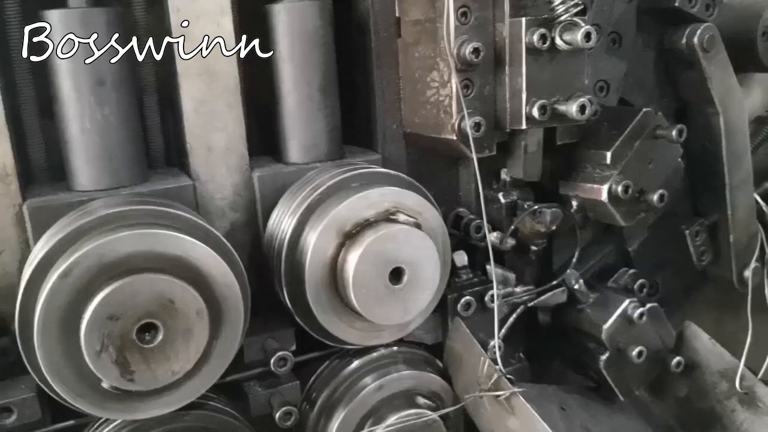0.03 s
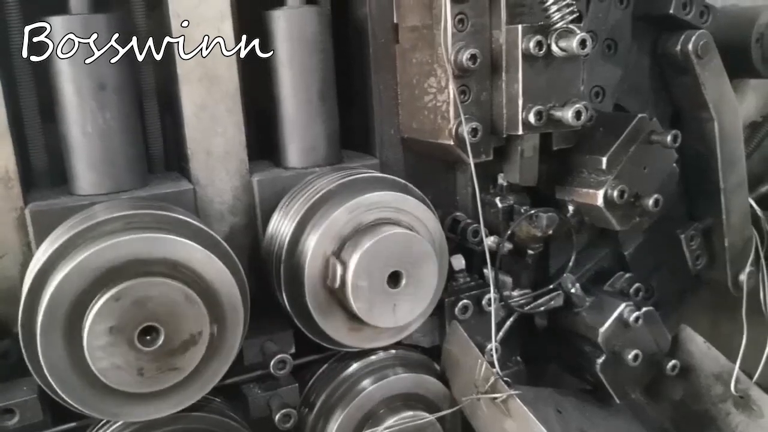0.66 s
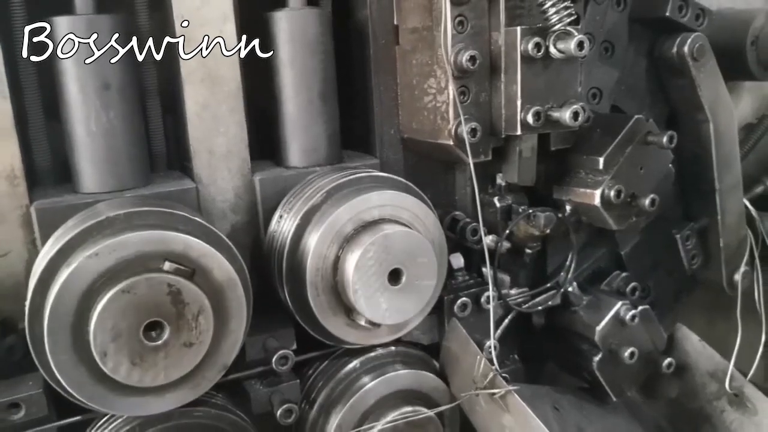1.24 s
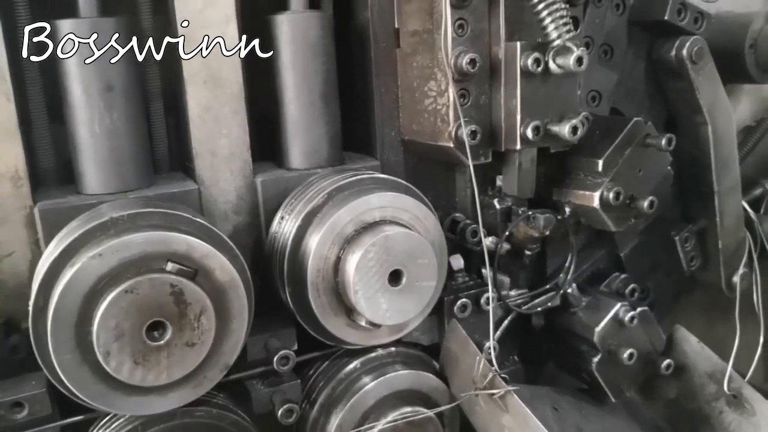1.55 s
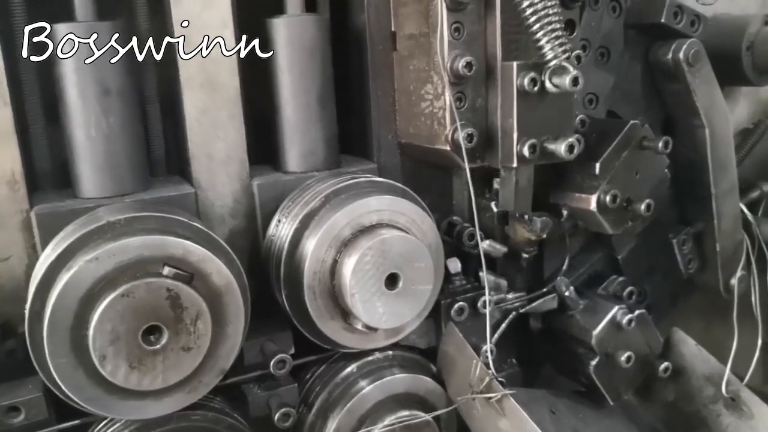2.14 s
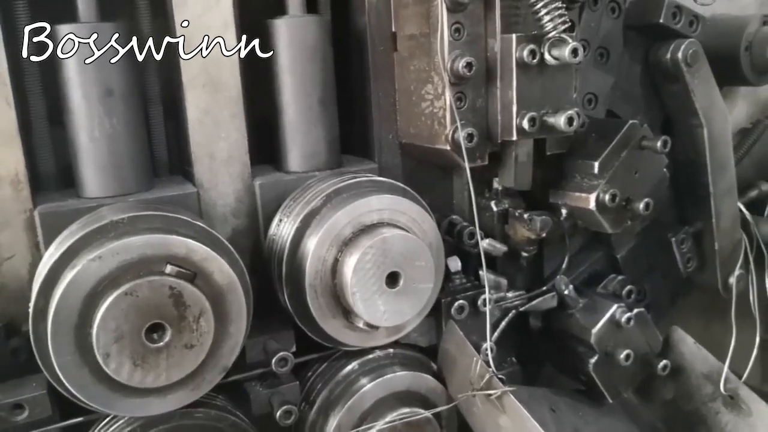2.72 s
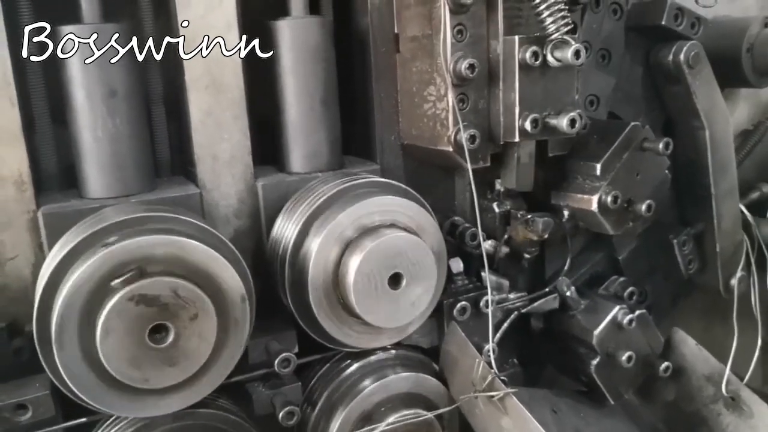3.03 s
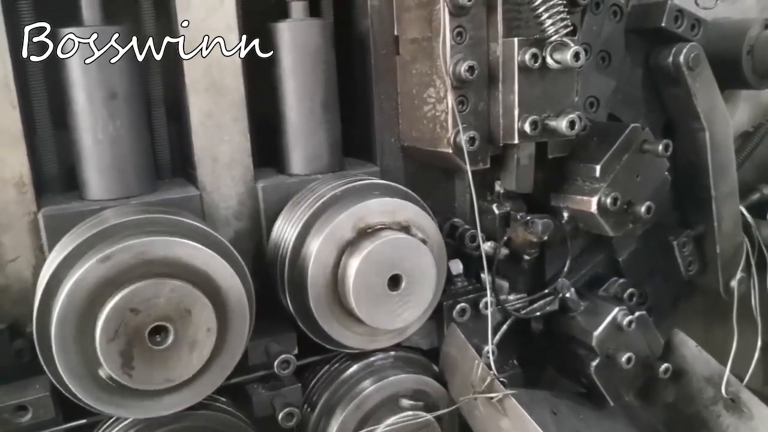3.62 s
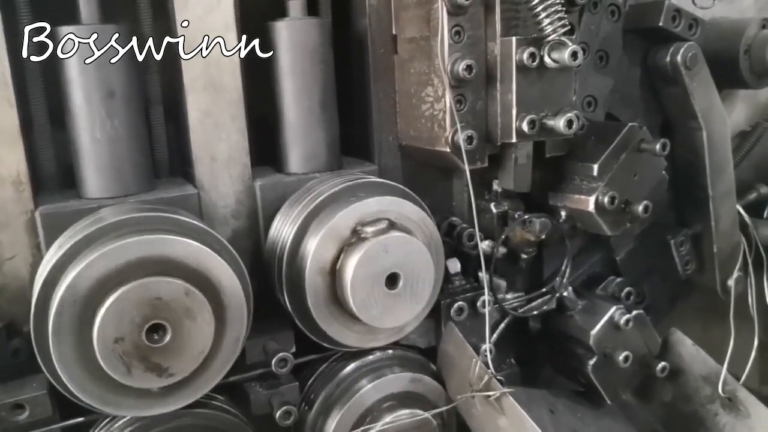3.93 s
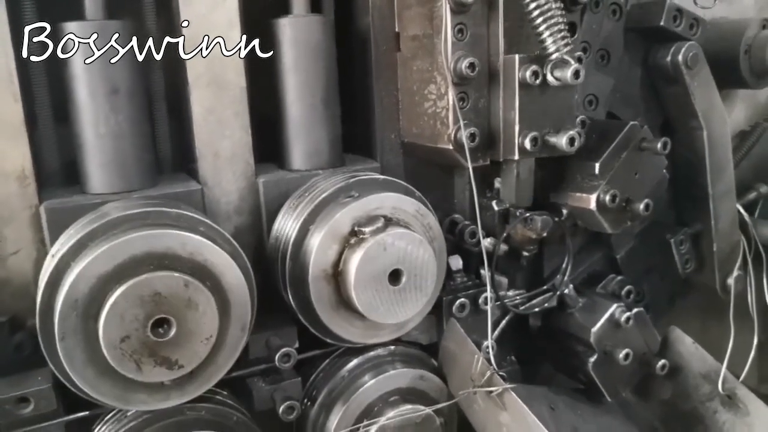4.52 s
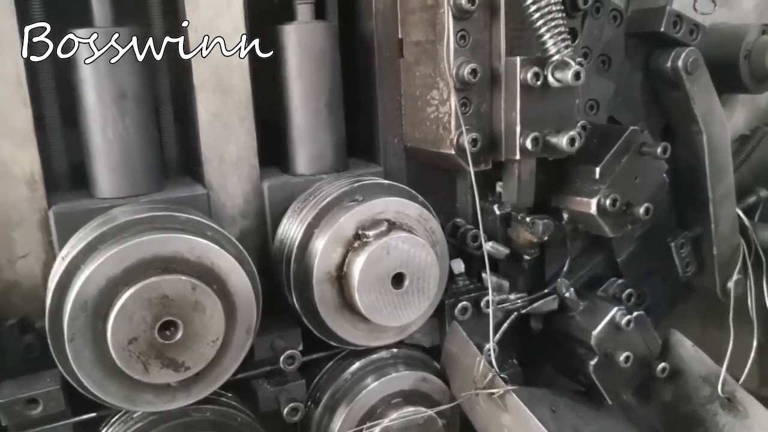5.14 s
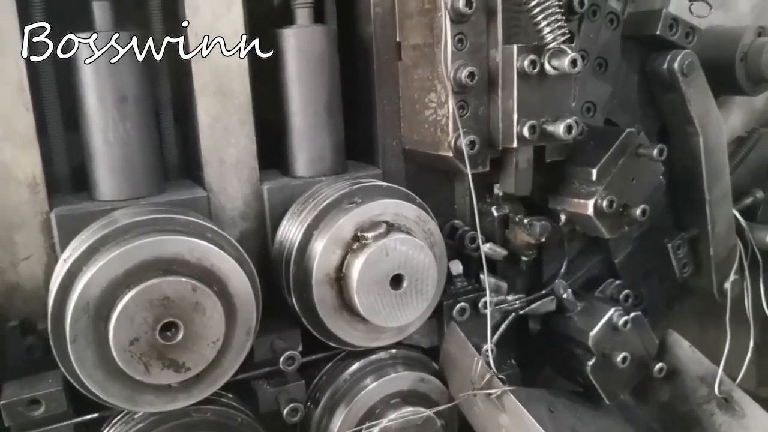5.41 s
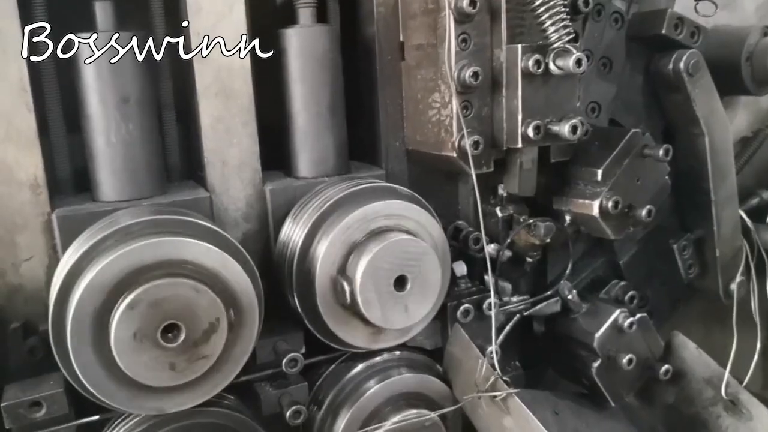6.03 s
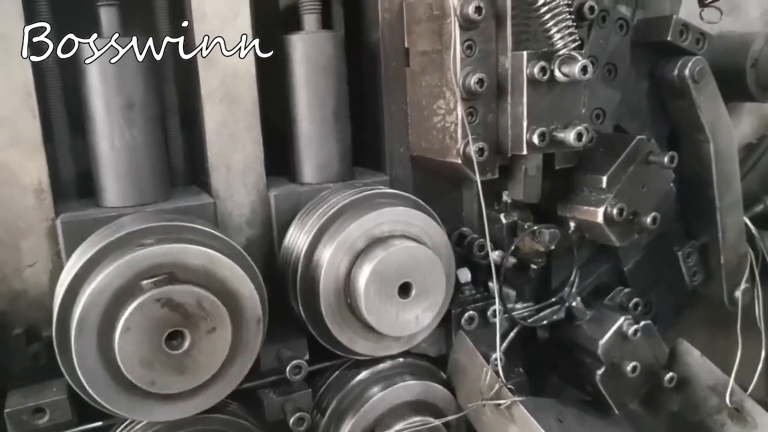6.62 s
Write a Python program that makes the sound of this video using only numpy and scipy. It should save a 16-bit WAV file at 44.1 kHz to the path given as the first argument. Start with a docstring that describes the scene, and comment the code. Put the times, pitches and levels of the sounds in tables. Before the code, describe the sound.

After a brief silence, humming motors, rumbling gears and rushing fans start at 0.4 seconds and continue throughout, close by. At 1.1 seconds the wire forming machine's feed rollers jerk with a thud, squeak and twang. A cutter snaps at 1.8, followed by ringing steel clacks, the sharpest at 2.2, and a jingle of loose steel around 2.5. More thudding, squeaky feed jerks come at 3.1 and around 3.8. At 4.2 the rollers clank shut with a faintly whistling puff of air. The cutter cracks again at 4.7, then tool slides clack quickly and wire twangs until about 5.1, and steel jingles at 5.2. Another feed jerk thuds at 5.6, and a last clank and air puff come at 6.4, with the hum running on to about 6.9. Hard workshop walls add a short echo, and the volume dips briefly after each loud blow.

```python
"""Motors hum, gears rumble and fans rush as a wire forming machine runs two cycles, heard from close by.
Its heavy frame thuds, feed rollers jerk the wire, and the wire squeaks and twangs. Tool slides clack,
the cutter snaps and loose steel jingles; the rollers clamp shut with a puff of air.
The hard workshop walls echo, and an automatic volume control dips after each loud blow."""
import sys
import numpy as np
from scipy import signal
from scipy.fft import rfft, irfft, next_fast_len
from scipy.io import wavfile
from scipy.ndimage import uniform_filter1d, map_coordinates

SR = 44100
rng = np.random.default_rng(int(sys.argv[2]) if len(sys.argv) > 2 else 0)


def wav_record(signal):
    """Record a signal, one row per channel, as 16-bit PCM in the file named by sys.argv[1]."""
    frames = np.transpose(np.atleast_2d(signal))
    bounded = np.clip(frames, -1, 1)
    # unit amplitude maps onto the largest positive 16-bit level
    quanta = np.round(bounded * 32767).astype(np.int16)
    wavfile.write(sys.argv[1], SR, quanta)


N = 302967
TIME = np.arange(N) / SR
AGE = np.arange(SR) / SR  # seconds since a blow
FREQS_HZ = np.fft.rfftfreq(SR, 1 / SR)  # the frequencies in a one-second sound

# the rollers jerk the wire: start_s, clatter_db, attack_s, thud_db, thud_hz
FEED_JERKS = [(1.13, -25, 0.018, -22.5, 168.5), (3.131, -27.5, 0.0022, -24.5, 195),
              (3.696, -33, 0.0057, -26.5, 159), (3.812, -32, 0.002, -18.5, 169),
              (5.568, -35, 0.0073, -43, 147), (5.616, -28, 0.011, -18, 157.2)]
# the cutter bites through: start_s, level_db, brightness_db_per_octave
WIRE_CUTS = [(1.8149, -16, 0.6), (4.6888, -13.5, 1)]
# the rollers clamp shut: start_s, level_db, brightness_db_per_octave
CLAMP_STROKES = [(4.1698, -14.5, -0.1), (6.449, -17, 0.1)]


def amp(db):
    """Turn decibels into a multiplier."""
    return 10 ** (np.asarray(db) / 20)


def unit(x):
    """Scale a sound to an average power of 1."""
    return x / np.sqrt(np.mean(x ** 2) + 1e-20)


def along(points, hz):
    """Read between rows of pitch_hz, value, with octaves evenly spaced."""
    pitches, values = np.transpose(points)
    return np.interp(np.log(hz + 1), np.log(pitches + 1), values)


def wobble(rate, size=N):
    """A smooth curve through `rate` random values a second."""
    return map_coordinates(rng.standard_normal(int(size * rate / SR) + 4), [TIME[:size] * rate])


def noise(tone, size, shape_db=0):
    """Noise of power 1; tone and shape_db set how strong its frequencies are against each other."""
    gain = amp(along(tone, np.fft.rfftfreq(size, 1 / SR)) + shape_db)
    return unit(irfft(rfft(rng.standard_normal(size)) * gain, size))


def fade(decay_s, t=AGE):
    """Die away by 60 dB in decay_s."""
    return np.exp(-np.log(1000) * np.minimum(t / decay_s, 10))


def add(track, start_s, sound):
    """Mix a sound into the track at start_s."""
    part = track[round(start_s * SR):][:len(sound)]
    part += sound[:len(part)]


def wavering_tone(hz, width_hz):
    """Many close pitches around hz beat gently against each other."""
    band = np.exp(-.5 * np.minimum(np.abs(FREQS_HZ - hz) / width_hz, 10) ** 2)
    tones = np.fft.ifft(rfft(rng.standard_normal(SR)) * band, SR)
    return unit(tones.real / (np.abs(tones) + 1e-12) ** .6)  # partly evens out the loudness


def echo(sound):
    """The workshop's echo builds up quickly; its middle rings longest, while bass and treble die away sooner."""
    # how long the room rings: pitch_hz, decay_s
    room_decay = [(150, 0.32), (1000, 0.88), (2500, 0.76), (7000, 0.49), (12000, 0.33)]
    hz, t, spectrum = signal.stft(rng.standard_normal(SR), SR, nperseg=256)
    spectrum = spectrum * fade(along(room_decay, hz)[:, None], t)
    tail = signal.istft(spectrum, SR)[1][:SR] * (1 - np.exp(-AGE / 0.014))
    return signal.fftconvolve(sound, tail / np.linalg.norm(tail))[:SR]


def bounces(rattle_s, rebound, decay_s, count=40):
    """The loudness of a blow and its weakening bounces: each ticks, then dies away in the steel."""
    when = 2 * (np.arange(count) + rng.random(count)) / count
    power = rebound * np.exp(-when ** 2) * rng.lognormal(-.15, 0.8, count)
    hits = np.bincount(np.minimum(when * rattle_s * SR, SR - 1).astype(int), power, SR)
    hits[0] += 1  # the blow itself
    tick = 3.2 * fade(0.006) ** 2
    energy = np.abs(signal.fftconvolve(hits, fade(decay_s) ** 2 + tick)[:SR])
    return np.sqrt(energy / energy[:int((rattle_s + .005) * SR)].mean())


def blows(events, tone, rebound, decay_s, scrape_db, echo_db, rings=(), ring_db=0, width_hz=0):
    """Steel hits steel: a short scrape, a crash, any ringing tones, and the room's echo."""
    track = np.zeros(N)
    octaves = np.log2(np.maximum(FREQS_HZ, 400))
    for start_s, db, attack_s, rattle_s, brightness in events:
        # each spot that is struck favours its own pitches, more so in the treble
        ripple = map_coordinates(rng.standard_normal(400), [FREQS_HZ / 65])
        ripple_db = (1.6 + .5 * (octaves - octaves[0])) * ripple
        crash = bounces(rattle_s, rebound, decay_s) * noise(tone, SR, brightness * octaves + ripple_db)
        ring = sum(amp(level) * fade(life) * wavering_tone(hz, width_hz) for hz, level, life in rings)
        onset = 1 - np.exp(-AGE / attack_s)
        strike = onset * (crash + amp(ring_db) * ring)
        add(track, start_s, amp(db) * (strike + amp(echo_db) * echo(crash)))
        # the parts rub ever harder just before they meet
        scrape = fade(0.13)[::-1] * noise(tone, SR)
        add(track, start_s - 1, amp(db + scrape_db) * scrape)
    return track


def drives():
    """Gears rumble unevenly, fans rush and motors hum with a slight waver."""
    # the load on the drives: time_s, rumble_db, fan_db
    load = [(0.5, -38, -39.5), (1.0, -37, -37.5), (2.8, -38, -36.5), (4.0, -38.5, -38.5),
            (6.87, -37, -38.5)]
    # tone of the gears: pitch_hz, level_db
    gear_tone = [(22, -36), (38, -5.5), (75, -7), (166, 0.5), (265, -5.5), (312, -12), (450, -36),
                 (990, -119)]
    # tone of the fans: pitch_hz, level_db
    fan_tone = [(210, -5), (350, 1), (600, -3), (818, -3), (899, 1), (1170, -4.5), (1910, 0.5), (2790, -3),
                (4330, -9), (7750, -4.5), (11300, -27.5), (13400, -27.5), (14300, -52)]
    # motor notes: pitch_hz, level_db
    motor_notes = [(48.6, -56.5), (177.5, -50.5)]
    time_s, rumble_db, fan_db = np.transpose(load)
    rumble = amp(np.interp(TIME, time_s, rumble_db) + 1.4 * wobble(14)) * noise(gear_tone, N)
    fans = amp(np.interp(TIME, time_s, fan_db) + .7 * wobble(9) + .7 * wobble(70)) * noise(fan_tone, N)
    hum = np.zeros(N)
    for hz, db in motor_notes:
        level = np.sqrt(2) * amp(db + 1.3 * wobble(3.98))
        hum += level * np.sin(2 * np.pi * hz * TIME + 0.5 * wobble(5.1))
    return rumble + fans + hum


def frame_thuds(lag_s=.017, rock_s=.1, rise_s=0.029, cut_rise_s=0.01):
    """The heavy frame booms after every feed, clamp, bump and cut; cuts also jolt the whole machine."""
    # dull bumps of the drive: start_s, level_db, pitch_hz
    bumps = [(0.93, -31, 137), (2.731, -32.5, 334), (3.765, -27.5, 161), (5.115, -27, 206),
             (5.186, -34.5, 167), (6.109, -33, 132)]
    # tone of a thud: pitch_hz, level_db
    thud_tone = [(30, -31), (70, -14), (120, 2), (270, -1.5), (400, -14), (600, -11), (1500, -51)]
    # tone of a jolt: pitch_hz, level_db
    jolt_tone = [(15, -14), (35, 3), (120, 5), (300, 3), (900, -51)]
    thuds = []  # start_s, level_db, pitch_hz, swell_s
    for start_s, _, _, db, hz in FEED_JERKS:
        thuds.append((start_s + lag_s, db, hz, rise_s))
        thuds.append((start_s + lag_s + rock_s, db - 7.5, hz, rise_s))  # the frame rocks back
    thuds += [(start_s + lag_s, db - 10.5, 180.7, rise_s) for start_s, db, _ in CLAMP_STROKES]
    thuds += [(start_s, db, hz, rise_s) for start_s, db, hz in bumps]
    thuds += [(start_s, db - 3, 130, cut_rise_s) for start_s, db, _ in WIRE_CUTS]
    track = np.zeros(N)
    for start_s, db, hz, swell_s in thuds:
        swell = (1 - np.exp(-AGE / swell_s)) * fade(0.26)
        boom = 0.58 * np.sin(2 * np.pi * hz * AGE) + 0.5 * noise(thud_tone, SR)
        add(track, start_s, amp(db) * swell / swell.max() * boom)
    for start_s, *_ in WIRE_CUTS:
        add(track, start_s, amp(-24) * fade(0.53) * noise(jolt_tone, SR))
    return track


def feed_rollers(gap_s=.019, rattle_s=.04, brightness=-0.77):
    """Each jerk is two blows: the gears take up their slack, then drive home."""
    # tone of a jerk: pitch_hz, level_db
    jerk_tone = [(210, -5), (350, 0), (450, -18), (805, -5.5), (1020, -3.5), (1640, -6.5), (2200, -1),
                 (4140, -10.5), (7210, -4), (10100, -27.5), (14000, -42)]
    # the rollers ring: pitch_hz, level_db, decay_s
    roller_rings = [(987, 10.7, 0.49), (1700, 3, 0.21), (2210, 7.8, 0.19)]
    pairs = []
    for start_s, db, attack_s, *_ in FEED_JERKS:
        pairs.append((start_s, db + 2.5, attack_s, rattle_s, brightness))
        pairs.append((start_s + gap_s, db, attack_s, rattle_s, brightness))
    return blows(pairs, jerk_tone, rebound=0.57, decay_s=0.062, scrape_db=-12, echo_db=-5.5,
                 rings=roller_rings, ring_db=-27.5, width_hz=82)


def wire_squeaks(half_length_s=0.0094, echo_db=-5.0):
    """The wire sticks and slips, which makes it squeak on one rough note."""
    # the wire slips: peak_s, level_db, pitch_hz
    slips = [(1.144, -21.5, 5170), (2.528, -27, 5120), (3.72, -30.5, 2210), (3.76, -32, 2290),
             (3.828, -27.5, 5160), (5.585, -31.5, 5160), (5.629, -32, 5050)]
    track = np.zeros(N)
    swell = np.exp(-.5 * (AGE / half_length_s - 2) ** 2) * (1 - np.exp(-AGE / half_length_s))
    for peak_s, db, hz in slips:
        squeak = swell * wavering_tone(hz, width_hz=290)
        add(track, peak_s - 2 * half_length_s, amp(db) * (squeak + amp(echo_db) * echo(squeak)))
    return track


def wire_twangs():
    """Loose lengths of wire and springs ring, wavering as they sway, until a tool stops them."""
    # the twangs: start_s, pitch_hz, level_db, free_s
    twangs = [(1.165, 1030, -30, 0.02), (1.17, 1978, -31, 0.17), (2.21, 370, -28.5, 0.37),
              (3.15, 1024, -30, 0.015), (3.15, 2160, -30, 0.014), (3.15, 1965, -30, 0.21),
              (4.69, 534, -29, 0.12), (4.823, 430, -20.5, 0.002), (5.04, 1088, -20, 0.097),
              (5.04, 1965, -24.5, 0.12), (5.041, 1703, -28, 0.069)]
    track = np.zeros(N)
    for start_s, hz, db, free_s in twangs:
        damper = fade(0.24, np.maximum(AGE - free_s, 0))
        sway_db = 1.3 * wobble(30, SR)
        drift = .25 * wobble(30, SR)
        tone = amp(sway_db) * np.sin(2 * np.pi * hz * AGE + drift)
        add(track, start_s, amp(db) * fade(2.5) * damper * tone)
    return track


def tool_slides():
    """Sliding tools clack against their stops and ring on."""
    # the hits: start_s, level_db, attack_s, rattle_s, brightness_db_per_octave
    clacks = [(1.778, -24.5, 0.02, 0.059, 0.5), (1.893, -23.5, 0.003, 0.04, 1.6),
              (1.986, -17, 0.0077, 0.043, 1.5), (2.2068, -8.5, 0.0016, 0.021, 3),
              (4.8175, -19, 0.0005, 0.027, 1.5), (4.882, -14, 0.0034, 0.019, 3.5),
              (5.037, -15.5, 0.001, 0.064, 1.5), (5.129, -25, .001, 0.0093, 0)]
    # tone of a clack: pitch_hz, level_db
    clack_tone = [(150, -49), (250, -14), (364, -1.5), (471, -3), (900, -2.5), (1070, 1.5), (1290, -2),
                  (1950, 1.5), (3000, -3.5), (3850, -9), (7850, -8.5), (8250, -16), (10500, -29.5),
                  (13100, -34), (15000, -80)]
    # the slides ring: pitch_hz, level_db, decay_s
    slide_rings = [(1045, 2.5, .75), (1460, -1, .8), (1585, 1, .75), (1815, 1, .7), (1935, 4.5, .95),
                   (2010, -1, .9), (2135, 2, .9), (2870, 2.5, .7), (3610, 3, .55), (4560, 3, .5),
                   (5828, 3.5, .5), (6518, 3.5, .5), (7412, 3, .45)]
    return blows(clacks, clack_tone, rebound=0.12, decay_s=0.11, scrape_db=-20, echo_db=-6.0,
                 rings=slide_rings, ring_db=-20.0, width_hz=18.6)


def cutter(attack_s=0.00033, rattle_s=0.0045, crack_peak_s=0.0026, crack_db=5.5):
    """The wire breaks with one sharp crack and a short, dead crash of the tool."""
    # tone of the tool: pitch_hz, level_db
    tool_tone = [(120, -38), (200, 2), (659, -13), (1040, -6), (1170, -13.5), (1880, -10.5), (7280, -18.5),
                 (10800, -41.5), (13700, -30), (15000, -64)]
    # tone of the breaking wire: pitch_hz, level_db
    crack_tone = [(400, -10), (2400, 7), (6500, 7), (9000, -28), (14000, -48)]
    snaps = [(start_s, db, attack_s, rattle_s, brightness) for start_s, db, brightness in WIRE_CUTS]
    track = blows(snaps, tool_tone, rebound=0.031, decay_s=0.2, scrape_db=-13.5, echo_db=-11.5)
    burst = (AGE / crack_peak_s) ** 2 * np.exp(1 - (AGE / crack_peak_s) ** 2)
    for start_s, db, _ in WIRE_CUTS:
        add(track, start_s, amp(db + crack_db) * burst * noise(crack_tone, SR))
    return track


def loose_steel(rattle_s=0.033):
    """Loose steel tumbles and scrapes in a gritty run of small hits."""
    # the jingles: start_s, level_db, attack_s, brightness_db_per_octave
    jingles = [(2.43, -33, 0.0073, 10), (2.464, -29.5, 0.0036, 4.5), (2.5161, -26, 0.00054, 4),
               (2.578, -35, 0.004, 9), (5.2236, -20.5, 0.0027, 1.5), (5.295, -28.5, 0.0034, 7.5)]
    # tone of a jingle: pitch_hz, level_db
    jingle_tone = [(530, -43), (900, -40), (1050, 15), (1380, -37), (1970, 15), (3390, 1.5), (7240, 3.5),
                   (10100, -13.5), (13500, -18)]
    # the pieces ring: pitch_hz, level_db, decay_s
    steel_rings = [(5150, -1, 0.2), (7080, -2, 0.22), (7410, 2, 0.3), (7800, -3, 0.15)]
    hits = [(start_s, db, attack_s, rattle_s, brightness)
            for start_s, db, attack_s, brightness in jingles]
    return blows(hits, jingle_tone, rebound=0.26, decay_s=0.061, scrape_db=-19, echo_db=-7.0,
                 rings=steel_rings, ring_db=-5.5, width_hz=78)


def clamps(attack_s=0.005, rattle_s=0.041):
    """The rollers close on the wire with a crisp clank."""
    # tone of a clank: pitch_hz, level_db
    clank_tone = [(240, -5.5), (450, -8.5), (750, -5), (1050, 2), (1260, -8), (1600, 1), (2960, -3),
                  (4280, -8.5), (5830, -7.5), (7600, -9.5), (8200, -16.5), (13500, -39.5)]
    # the clamp rings: pitch_hz, level_db, decay_s
    clamp_rings = [(1035, 12.2, 0.047), (3254, 8.8, 0.063), (3720, 7.2, 0.07)]
    clanks = [(start_s, db, attack_s, rattle_s, brightness) for start_s, db, brightness in CLAMP_STROKES]
    return blows(clanks, clank_tone, rebound=0.14, decay_s=0.14, scrape_db=-18.0, echo_db=-8.5,
                 rings=clamp_rings, ring_db=-7.5, width_hz=70)


def air_puffs(level_db=-32.0, length_s=0.39):
    """After each clamp an air cylinder empties with a hiss and faint whistles."""
    # tone of the hiss: pitch_hz, level_db
    hiss_tone = [(300, -13), (1000, 2), (2200, 2), (7300, -4.5), (8400, -25.5), (13500, -34)]
    # the air catches an edge and whistles: start_s, pitch_hz, level_db, held_s
    whistles = [(4.21, 3984, -40.5, .17), (4.36, 2982, -42.5, .19), (4.38, 6780, -43, .11),
                (6.52, 3984, -39, .24)]
    track = np.zeros(N)
    flow = (1 - np.exp(-AGE / .03)) * np.exp(-(AGE / length_s) ** 3)
    for start_s, *_ in CLAMP_STROKES:
        add(track, start_s, amp(level_db) * flow * noise(hiss_tone, SR))
    for start_s, hz, db, held_s in whistles:
        swell = signal.windows.tukey(round(held_s * SR), .5)
        add(track, start_s, amp(db) * swell * wavering_tone(hz, width_hz=7)[:len(swell)])
    return track


def scene():
    """All parts of the machine, mixed into one channel."""
    squeaks = wire_squeaks()
    air = air_puffs()
    clatter = tool_slides() + clamps() + feed_rollers() + cutter() + loose_steel()
    return (clatter + squeaks + air + frame_thuds() + wire_twangs() + drives())[None]


def volume_control(sound, threshold_db, strength, recovery_db_per_s):
    """Loud sound turns the volume down at once; it then comes back steadily."""
    level_db = 10 * np.log10(np.abs(uniform_filter1d(sound ** 2, size=300)) + 1e-12)
    dip_db = strength * np.maximum(level_db - threshold_db, 0)
    recovery_db = recovery_db_per_s * TIME
    held_db = np.maximum.accumulate(dip_db + recovery_db, axis=-1) - recovery_db
    return sound * amp(-uniform_filter1d(held_db, size=100))


def record(dry, start_s=0.419, top_hz=14250):
    """Turn down loud blows, keep silent until start_s and remove the treble above top_hz."""
    fade_in = np.clip((TIME - start_s) / 0.0053, 0, 1)
    sound = volume_control(dry, threshold_db=-21.0, strength=0.59, recovery_db_per_s=35) * fade_in
    size = next_fast_len(N + SR)
    below_top = np.fft.rfftfreq(size, 1 / SR) < top_hz
    return irfft(rfft(sound, size) * below_top, size)[:, :N]


dry = scene()
out = record(dry)
wav_record(out)
```